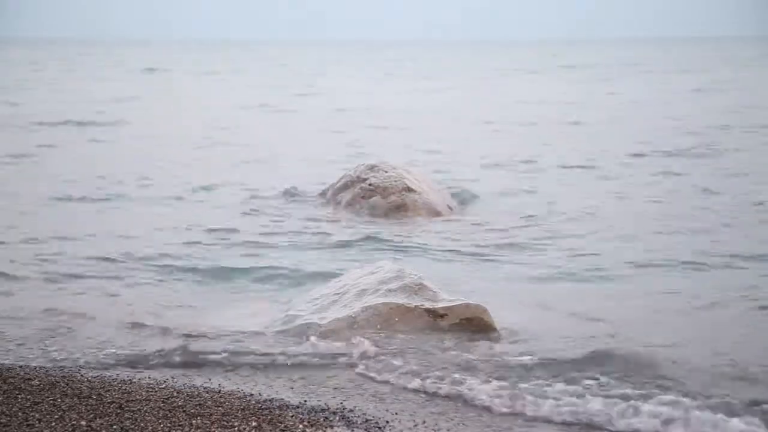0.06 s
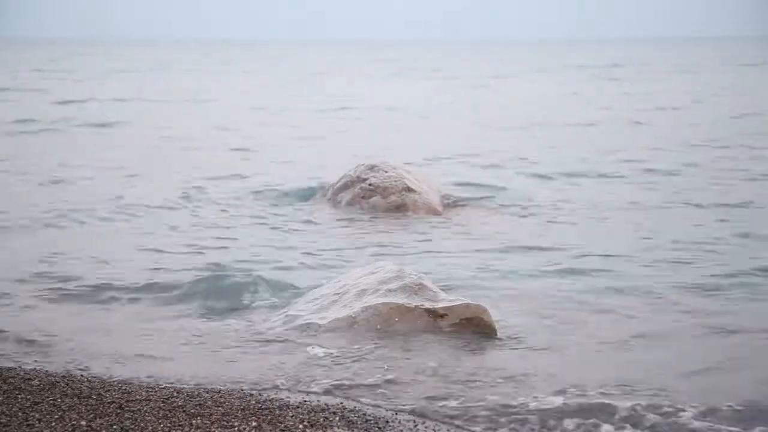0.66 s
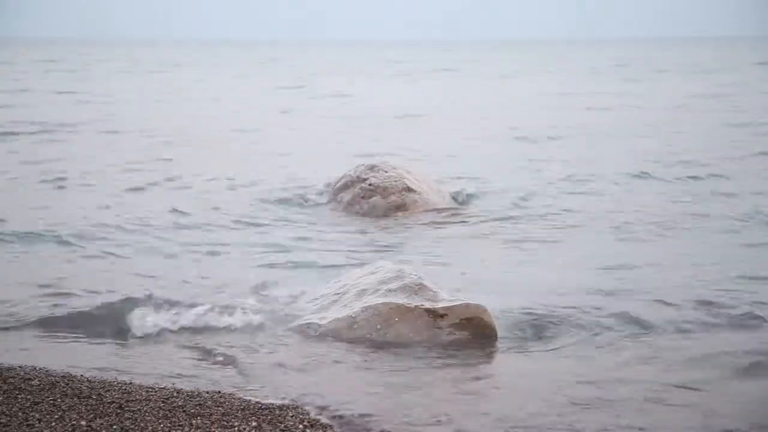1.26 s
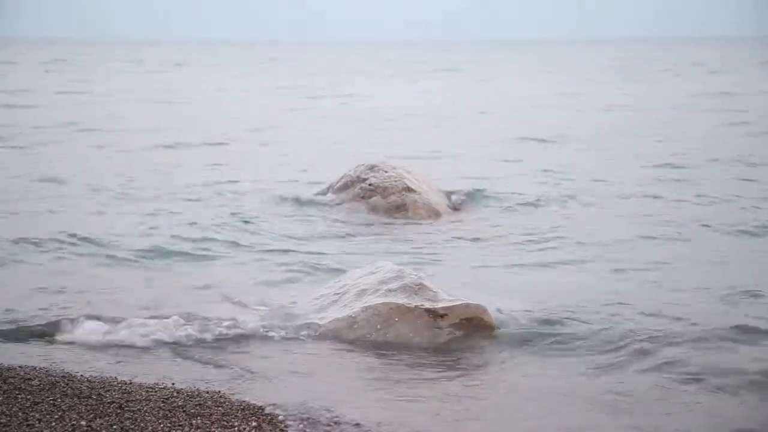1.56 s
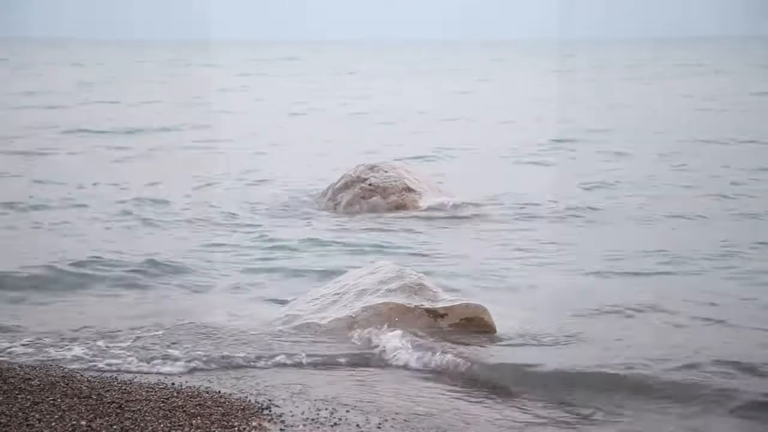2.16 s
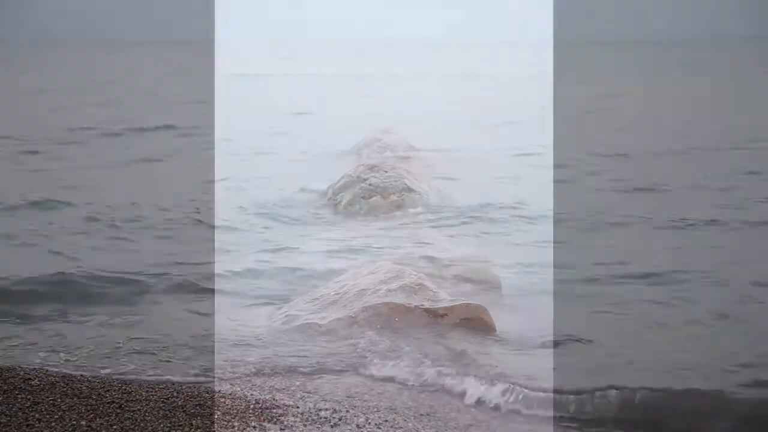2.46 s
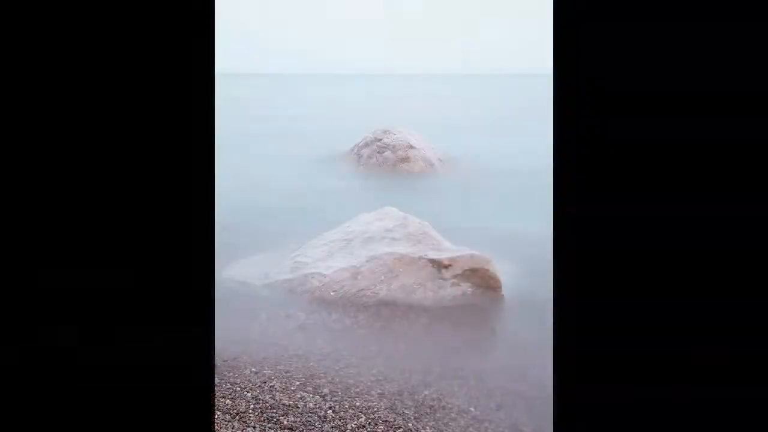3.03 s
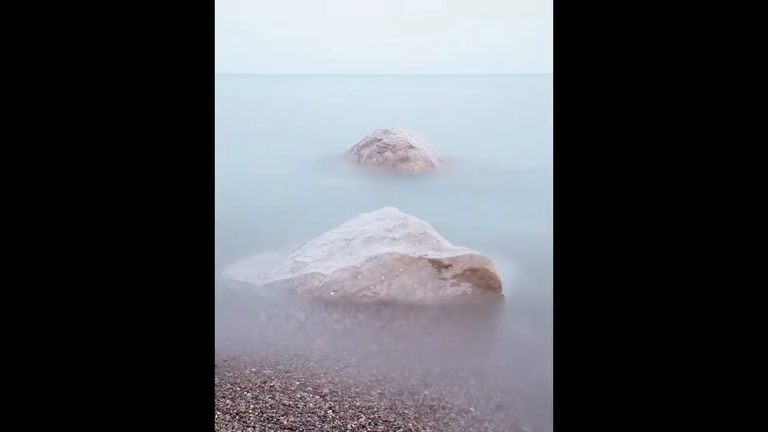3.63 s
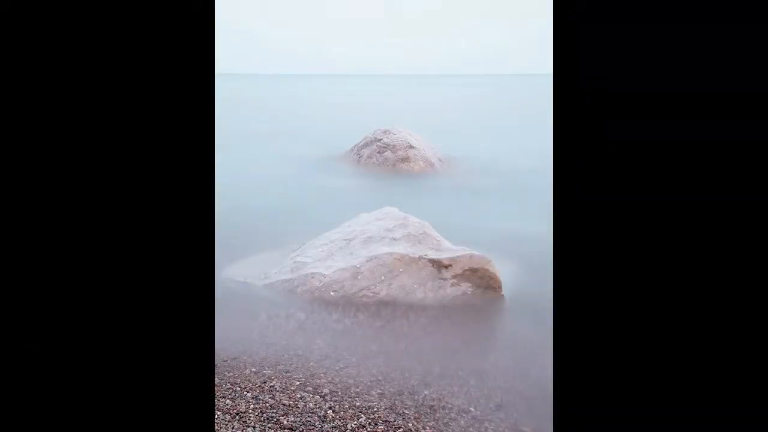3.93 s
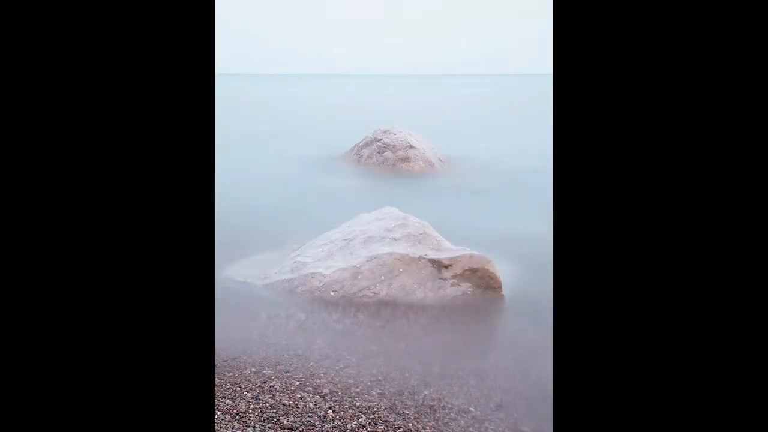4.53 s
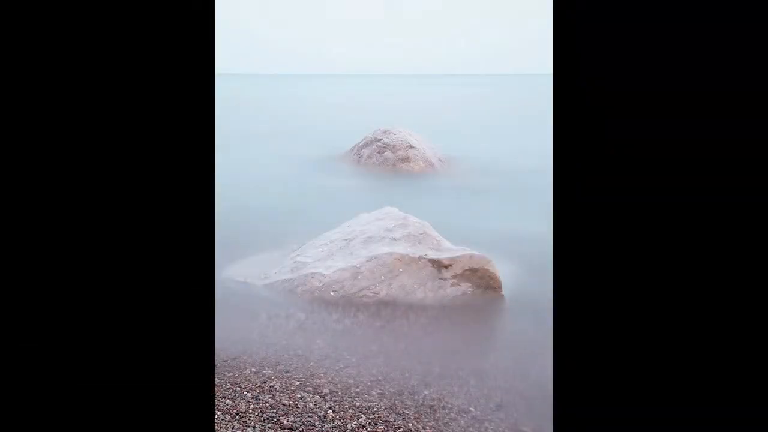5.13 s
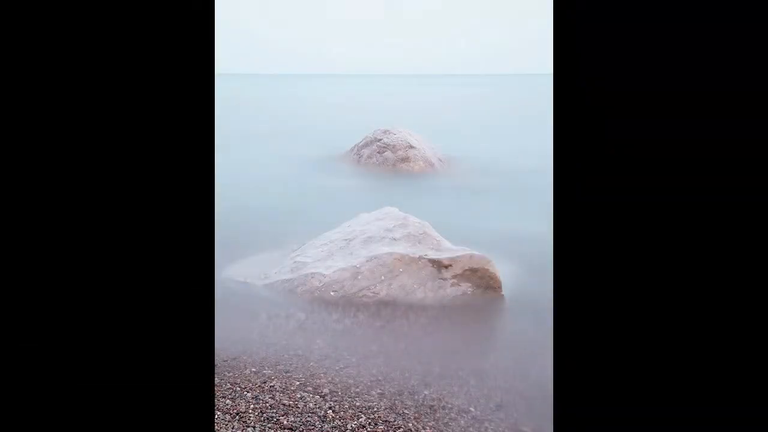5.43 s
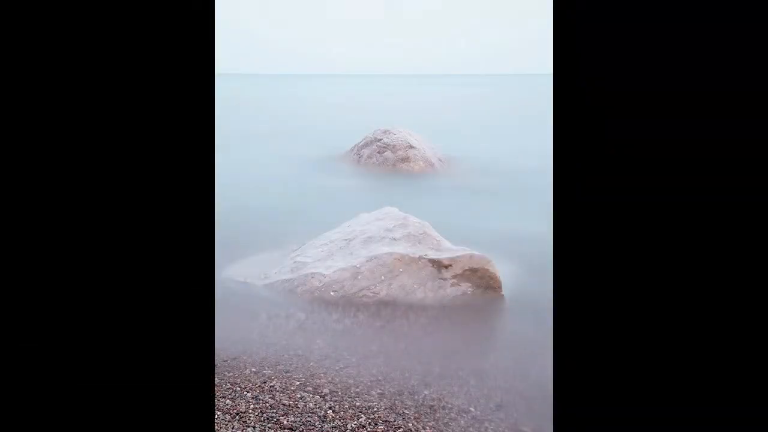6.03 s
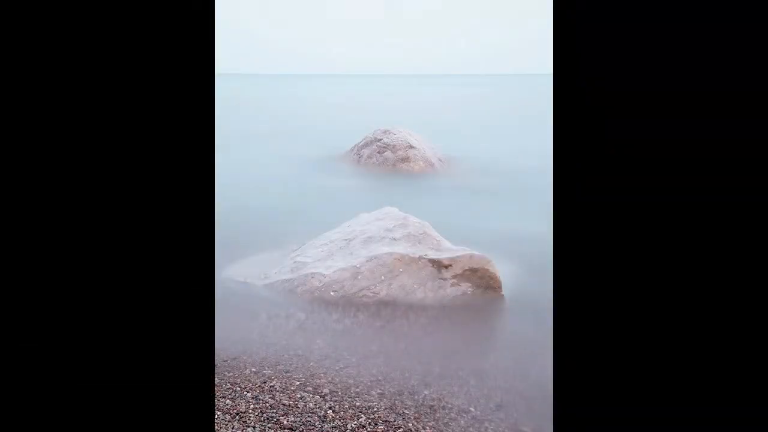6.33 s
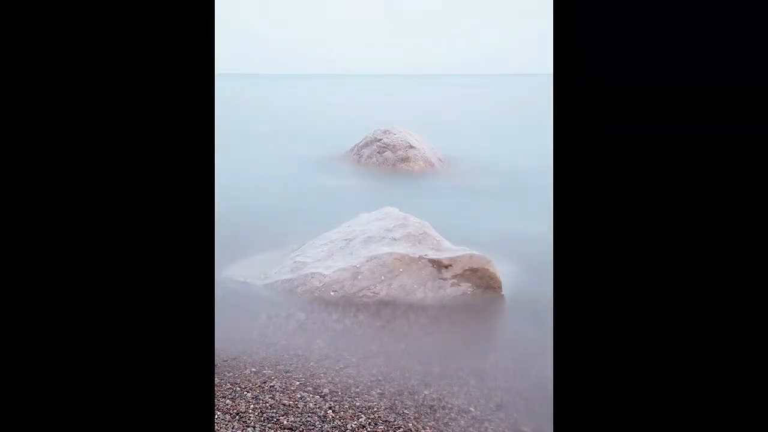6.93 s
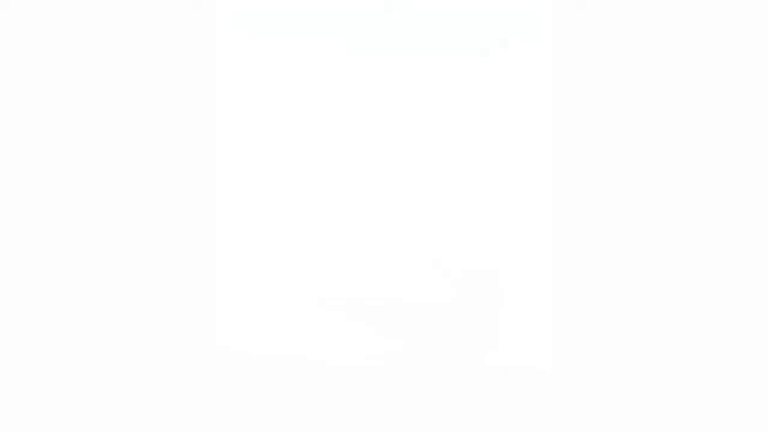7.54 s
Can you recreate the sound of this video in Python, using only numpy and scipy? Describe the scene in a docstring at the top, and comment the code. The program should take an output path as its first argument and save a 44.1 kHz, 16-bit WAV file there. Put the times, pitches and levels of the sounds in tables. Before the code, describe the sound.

Small waves lap and wash onto a pebble beach, gurgling, fizzing and draining back through clicking stones, then fading out.

```python
"""A pebble beach on a lake: small waves break around boulders and run up and down the shore.
Each wave traps air that rings as gulps and gurgles, throws a fizzing spray and drags pebbles
that click together. About a second later it drains back through the stones.
A faint low rumble lies underneath, and the sound fades out at the end."""
import sys
import numpy as np
from scipy import signal
from scipy.fft import rfft, irfft, next_fast_len
from scipy.io import wavfile
from scipy.ndimage import uniform_filter1d, map_coordinates

SR = 44100
rng = np.random.default_rng(int(sys.argv[2]) if len(sys.argv) > 2 else 0)


def write(x):
    x = np.atleast_2d(x).T
    wavfile.write(sys.argv[1], SR, np.round(np.clip(x, -1, 1) * 32767).astype(np.int16))


N = 343583

# breaking waves: (time [s], length [s], slosh [dB], wash [dB], spray [dB], shingle [dB], backwash [dB])
WAVES = [(-.11, 0.25, -29, -26, -26, -28, -34.5), (1.415, 0.54, -36, -28.5, -27.5, -28, -33.5),
         (2.147, 0.2, -39, -31.5, -28.7, -27, -31.5), (4.15, 0.3, -36.5, -35, -31.5, -43, -32)]


def amp(db):
    """Decibels to gain."""
    return 10 ** (np.asarray(db) / 20)


def unit(x):
    """Scale to rms 1."""
    return x / np.sqrt(np.mean(x ** 2) + 1e-20)


def curve(points):
    """(time [s], value) points, interpolated per sample."""
    return np.interp(np.arange(N) / SR, *np.transpose(points))


def wobble(rate_hz):
    """Smooth random curve, rate_hz knots per second."""
    knots = rng.standard_normal(int(N * rate_hz / SR) + 4)
    return map_coordinates(knots, [np.arange(N) * rate_hz / SR], order=2)


def filtered(x, response):
    """Zero-phase filter with gain response(hz)."""
    size = next_fast_len(N + 8192)
    return irfft(rfft(x, size) * response(np.fft.rfftfreq(size, 1 / SR)), size)[:N]


def coloured(x, tone):
    """Shape x by (frequency [Hz], level [dB]) points on a log axis; rms 1."""
    points_hz, db = np.transpose(tone)
    return unit(filtered(x, lambda hz: amp(np.interp(np.log(hz + 1), np.log(points_hz), db))))


def add(track, start_s, sound):
    """Mix a sound in, cut at both ends of the track."""
    start = round(start_s * SR)
    sound = sound[max(-start, 0):]
    part = track[max(start, 0):][:len(sound)]
    part += sound[:len(part)]


def bubble(t, hz, cycles, rise):
    """Ringing air pocket: decays by 1/e in `cycles`; pitch climbs as it nears the surface."""
    age = t * hz / cycles
    phase = 2 * np.pi * cycles * (age + rise * (age - 1 + np.exp(-age)))
    return np.sin(phase) * np.exp(-age) * (1 - np.exp(-2 * t * hz))


def swarm(count, low_hz, high_hz, cycles, rise, spread_db):
    """Ringing grains at random times, most weak, a few strong; rms 1."""
    when, pitch, size, life, side = rng.random((5, count), dtype=np.float32)
    hz = low_hz * (high_hz / low_hz) ** pitch
    ring_cycles = cycles * (.5 + life)
    strength = np.sign(side - .5) * amp(-spread_db * np.log(1 - .99 * size)) * hz / high_hz
    length = (np.pi * ring_cycles / hz * SR).astype(int)
    grain = np.repeat(np.arange(count), length)
    step = np.arange(len(grain)) - (np.cumsum(length) - length)[grain]  # sample index within grain
    sound = strength[grain] * bubble(step.astype(np.float32) / SR, hz[grain], ring_cycles[grain], rise)
    return unit(np.bincount((when * N).astype(int)[grain] + step, sound, N)[:N])


def patchy(x, depth_db):
    """Clouds of like-sized bubbles come and go, so the colour drifts; rms 1."""
    spectra = signal.stft(x, nperseg=512)[2]
    clouds = uniform_filter1d(rng.standard_normal(spectra.shape), size=7, axis=0)
    clouds = unit(uniform_filter1d(clouds, size=18, axis=1))
    return unit(signal.istft(spectra * amp(depth_db * clouds), nperseg=512)[1][:N])


def layer(grains, tone, blur_db, patchy_db):
    """Near grains over the blur of countless far ones, in one colour; rms 1."""
    blur = patchy(coloured(rng.standard_normal(N), tone), patchy_db)
    return unit(coloured(grains, tone) + amp(blur_db) * blur)


def envelope(start_s, length_s, rise_s, fall_db_per_s):
    """Power that rises until start_s, holds, then decays."""
    t = np.arange(N) / SR - start_s
    return (np.clip(t / rise_s + 1, 0, 1) * amp(-fall_db_per_s * np.maximum(t - length_s, 0))) ** 2


def swell(column, lag_s, rise_s, fall_db_per_s, calm_db):
    """Power of one layer: each wave at its level in that column, over the calm between waves."""
    return amp(calm_db) ** 2 + sum(
        amp(wave[column]) ** 2 * envelope(wave[0] + lag_s, wave[1], rise_s, fall_db_per_s)
        for wave in WAVES)


def rumble():
    """Faint, deep outdoor background."""
    # slow drift: (time [s], relative level [dB])
    drift = [(1.7, -48), (2.7, -54.5), (4.1, -51), (5.2, -55), (6.2, -53.5)]
    # spectrum: (frequency [Hz], relative level [dB])
    tone = [(12, -45.5), (26, -20.5), (38, -4), (50, 0), (62, -11), (90, -8), (200, -37), (800, -82)]
    return amp(curve(drift) + 1) * coloured(rng.standard_normal(N), tone)


def pebbles(ring_t60_s=.006, crack_db=-10, crack_t60_s=.013, bounce_s=.004, bounce_db=-13):
    """Stone on stone: short ring, crack and one weaker rebound, dulled by the water film."""
    # close knocks: (time [s], pitch [Hz], level before the band-pass [dB])
    knocks = [(.344, 5900, -12), (.53, 5830, -11.5), (.814, 5100, -11.5), (1.275, 5360, -12.5),
              (1.5845, 6600, -4), (2.0926, 3730, -6), (2.274, 5240, -6.5), (2.787, 5870, -12),
              (2.804, 7740, -10), (3.875, 6900, -11.5), (3.912, 5700, -11), (4.8734, 5100, -8.5),
              (4.935, 4100, -14), (5.265, 6700, -15), (5.908, 5500, -11), (6.061, 5190, -16),
              (6.219, 4820, -15), (6.627, 6460, -11.5), (6.692, 5750, -12)]
    track, t = np.zeros(N), np.arange(SR // 30) / SR
    for s, hz, db in knocks:
        ring = np.sin(2 * np.pi * hz * t) * amp(-60 * t / ring_t60_s)
        blow, rebound = ring + rng.standard_normal((2, len(t))) * amp(crack_db - 60 * t / crack_t60_s)
        add(track, s, amp(db) * blow)
        add(track, s + bounce_s * (.5 + rng.random()), amp(db + bounce_db) * rebound)
    return signal.sosfilt(signal.butter(3, [2800, 8000], "bandpass", fs=SR, output="sos"), track)


def drops(splash_db=-9, splash_t60_s=.035, gain_db=-4):
    """A drop slaps the surface and traps a small bubble."""
    # drops falling back: (time [s], pitch [Hz], relative level [dB])
    impacts = [(.973, 1970, -10), (1.216, 1330, -12), (1.471, 1690, -9), (2.19, 2130, -11.5),
               (3.286, 1320, -17), (3.603, 1730, -18), (6.48, 1410, -22), (6.633, 1630, -17),
               (6.692, 1500, -17)]
    track, t = np.zeros(N), np.arange(SR // 12) / SR
    band = signal.butter(3, [1200, 3300], "bandpass", fs=SR, output="sos")
    for s, hz, db in impacts:
        noise = unit(signal.sosfilt(band, rng.standard_normal(len(t))))
        splash = noise * amp(splash_db - 60 * t / splash_t60_s)
        add(track, s, amp(db + gain_db) * (bubble(t, hz, cycles=5, rise=.1) + splash))
    return track


def gulps(gain_db=-7.5):
    """Each air pocket rings once as the water closes over it."""
    # large air pockets: (time [s], pitch [Hz], relative level [dB])
    pockets = [(.146, 191, -12), (.159, 310, -15), (.404, 99, -20), (0.486, 147, -13.5), (.492, 423, -3),
               (0.676, 136, -13), (.678, 406, -5.5), (0.777, 162, -17), (.778, 423, -9), (.984, 147, -14),
               (1.573, 403, -12), (2.052, 350, -13), (3.748, 430, -13.5), (3.976, 507, -17),
               (4.232, 408, -15), (4.434, 398, -14), (4.647, 428, -11), (4.787, 413, -10),
               (5.024, 250, -19), (5.315, 520, -15), (5.922, 580, -12), (6.228, 560, -17),
               (6.585, 550, -14.5)]
    track, t = np.zeros(N), np.arange(SR // 5) / SR
    for s, hz, db in pockets:
        add(track, s, amp(db + gain_db) * bubble(t, hz, cycles=3.17, rise=.048))
    return track


def plunges(width_octaves=.6):
    """Water folds over a cloud of air that pulsates as one: a hollow boom that swells and sinks."""
    # bubble clouds: (centre time [s], pitch [Hz], half length [s], level [dB])
    clouds = [(.185, 290, 0.057, -25.5), (0.252, 750, 0.061, -33), (0.498, 440, 0.038, -28),
              (.705, 174, 0.062, -32.5), (1.218, 840, .02, -28), (1.519, 446, 0.12, -32),
              (1.798, 288, 0.072, -30.5), (2.3, 119, 0.057, -37), (2.431, 145, 0.063, -32),
              (2.452, 315, 0.039, -22.5), (2.549, 1300, .06, -29.5), (2.68, 138, 0.071, -43),
              (2.815, 390, 0.042, -30.5), (3.03, 1290, 0.16, -36), (3.272, 1200, .028, -30.5),
              (3.77, 480, 0.056, -34), (4.362, 1040, 0.03, -32), (4.46, 226, 0.052, -34.5),
              (4.71, 150, 0.053, -36.5), (4.721, 583, .077, -32.5), (6.358, 189, 0.085, -45)]
    track, t = np.zeros(N), np.arange(SR // 2) / SR - .25
    bins_hz = np.fft.rfftfreq(len(t), 1 / SR)
    for s, hz, half_s, db in clouds:
        resonance = np.exp(-(np.log2((bins_hz + 1) / hz) / width_octaves) ** 2 / 2)
        boom = unit(irfft(rfft(rng.standard_normal(len(t))) * resonance, len(t)))
        add(track, s + t[0], amp(db) * boom * np.exp(-(t / half_s) ** 2 / 2))
    return track


def water():
    """Big bubbles slosh under the wave; smaller ones gurgle in the wash."""
    # spectra: (frequency [Hz], relative level [dB])
    slosh_tone = [(30, -52.5), (65, -18), (100, -7.5), (150, -1), (210, -1), (290, -1), (400, 2.3),
                  (520, -3), (750, -7.5), (1600, -49.5)]
    wash_tone = [(150, -51.5), (380, -3.5), (580, 0), (900, 0.5), (1400, -2), (1800, -3.5), (2150, -13.5),
                 (2700, -23.5), (5000, -46)]
    slosh_gain = np.sqrt(swell(column=2, lag_s=.3, rise_s=.9, fall_db_per_s=6.5, calm_db=-41.5))
    wash_gain = np.sqrt(swell(column=3, lag_s=-.04, rise_s=.43, fall_db_per_s=5, calm_db=-36))
    big = swarm(count=1800, low_hz=100.1, high_hz=639, cycles=3.2, rise=.12, spread_db=2.5)
    small = swarm(count=4500, low_hz=448, high_hz=2435, cycles=5, rise=.15, spread_db=1.5)
    slosh = layer(big, slosh_tone, blur_db=2, patchy_db=-.26)
    wash = layer(small, wash_tone, blur_db=1.5, patchy_db=.36)
    return slosh_gain * amp(-.54) * slosh + wash_gain * amp(-.28 + .7 * wobble(rate_hz=28)) * wash


def backwash(lag_s=1, half_s=.38):
    """Power of the stones dragged down the slope as each wave drains."""
    t = np.arange(N) / SR
    return sum(amp(db) ** 2 * np.exp(-((t - s - length_s - lag_s) / half_s) ** 2)
               for s, length_s, *_, db in WAVES)


def surf_gains():
    """Gains of spray, shingle and mist: slow wave swell plus short splashes."""
    # crests slapping stone or water: (time [s], length [s], spray [dB], shingle [dB], mist [dB])
    slaps = [(0, .03, -28.5, -35, -41.5), (.34, .04, -39, -37, -41), (0.98, 0.032, -32, -37.5, -48.5),
             (1.472, 0.11, -39.5, -25, -45.5), (2.09, .11, -34.5, -30, -37.5),
             (2.155, .031, -24.5, -26, -41.5), (2.28, 0.094, -28.5, -33, -40.5),
             (2.488, 0.093, -25.5, -26, -38), (2.783, 0.2, -38, -30, -44.5),
             (4.12, 0.026, -31.5, -47, -55.5), (4.304, 0.089, -30, -40, -51)]
    spray = swell(column=4, lag_s=.02, rise_s=.32, fall_db_per_s=8.5, calm_db=-39)
    run_up = swell(column=5, lag_s=.29, rise_s=.44, fall_db_per_s=15, calm_db=-33.5)
    draining = backwash()
    # finest droplets: from spray, run-up and foam bursting in the backwash
    mist = amp(-20.5) ** 2 * spray + amp(-22) ** 2 * run_up + amp(-17) ** 2 * draining
    splashes = sum(np.outer(amp(db) ** 2, envelope(s, length_s, rise_s=.015, fall_db_per_s=150))
                   for s, length_s, *db in slaps)
    return np.sqrt(np.array([spray, run_up + draining, mist]) + splashes)


def surf():
    """Crests burst into spray and mist and the swash rolls the shingle, in shared quick spurts."""
    # spectra: (frequency [Hz], relative level [dB])
    spray_tone = [(500, -41.5), (1400, -5), (2000, 0.5), (2900, -0.5), (4000, -2.5), (5000, -4),
                  (8000, -15.5), (15000, -49.5)]
    shingle_tone = [(1500, -43.5), (3400, -6.5), (4500, -4.5), (5500, -0.5), (6700, -2.5), (7700, -8),
                    (9000, -16), (11000, -28.5), (15000, -54)]
    mist_tone = [(4000, -37.5), (7500, -1), (9300, -1), (10500, -6), (12000, -12.5), (14000, -18),
                 (16000, -23)]
    spray_gain, shingle_gain, mist_gain = surf_gains()
    force = (spray_gain / spray_gain.max()) ** .29  # a crest spurts harder than the backwash
    spurt = force * wobble(rate_hz=60)
    fizz = swarm(count=8000, low_hz=1582, high_hz=4880, cycles=4, rise=.1, spread_db=3)
    clicks = swarm(count=6000, low_hz=3970, high_hz=8950, cycles=4.8, rise=0, spread_db=3.5)
    droplets = swarm(count=3500, low_hz=7000, high_hz=12900, cycles=2.2, rise=0, spread_db=5)
    spray = layer(fizz, spray_tone, blur_db=4.5, patchy_db=1.3)
    shingle = layer(clicks, shingle_tone, blur_db=3.5, patchy_db=.84)
    mist = layer(droplets, mist_tone, blur_db=3, patchy_db=1)
    return (spray_gain * amp(.2 + .83 * spurt) * spray
            + shingle_gain * amp(-.09 + .93 * spurt + .52 * wobble(rate_hz=14)) * shingle
            + mist_gain * amp(.85 + 1.3 * spurt) * mist)


def scene():
    """The shoreline from one point on the beach, mono."""
    return (water() + surf() + plunges() + gulps() + drops() + pebbles() + rumble())[None]


def record(dry):
    """Fade to silence, then brick-wall low-pass."""
    # fade-out: (time [s], gain [dB])
    fade = [(4.9, 0), (5.79, -3.5), (5.96, -8), (6.5, -8.4), (6.67, -12.5), (6.74, -20), (6.88, -20.4),
            (7.0, -29.5)]
    silent_s, closing_s, top_hz = 7.06, .07, 15850
    fader = amp(curve(fade)) * np.clip((silent_s - np.arange(N) / SR) / closing_s, 0, 1)
    return filtered(dry[0] * fader, lambda hz: hz < top_hz)[None]


dry = scene()
out = record(dry)
write(out)
```